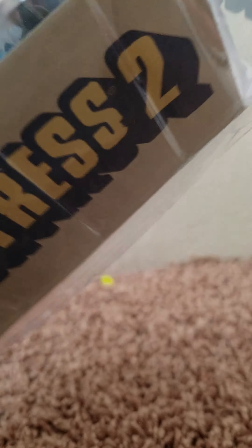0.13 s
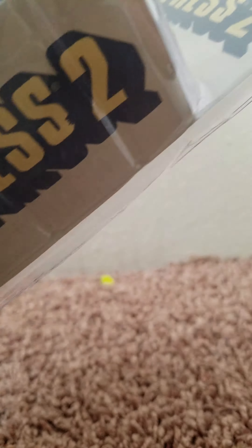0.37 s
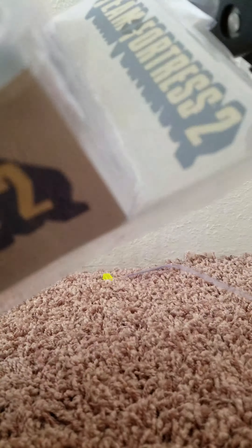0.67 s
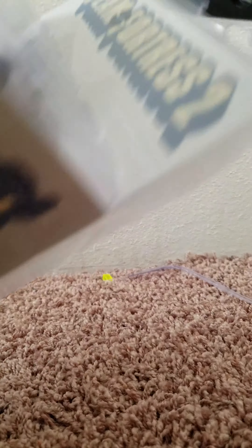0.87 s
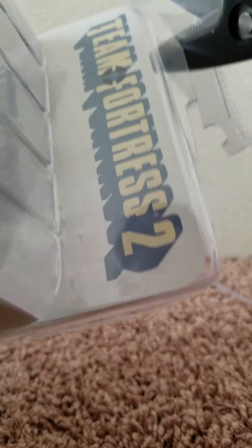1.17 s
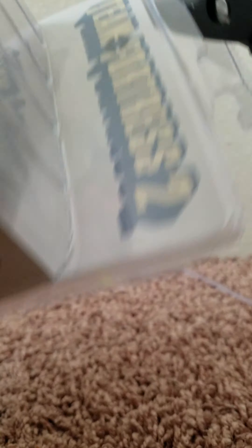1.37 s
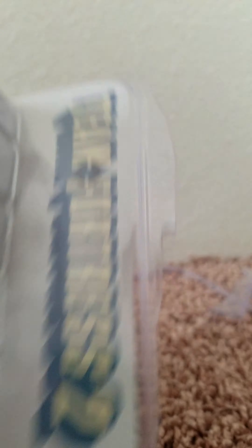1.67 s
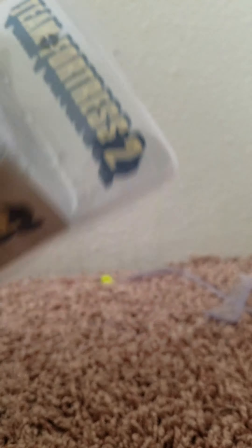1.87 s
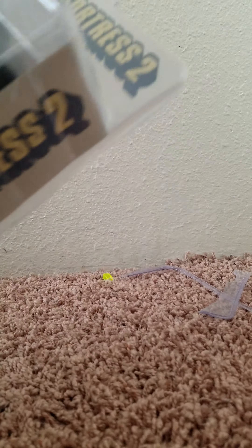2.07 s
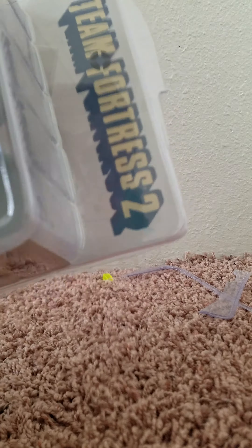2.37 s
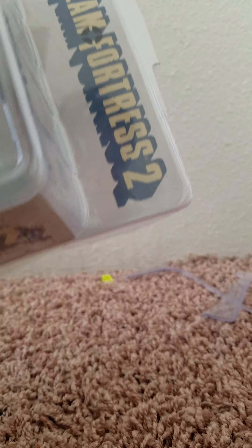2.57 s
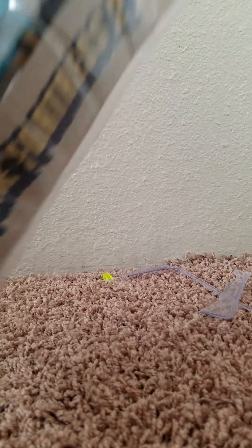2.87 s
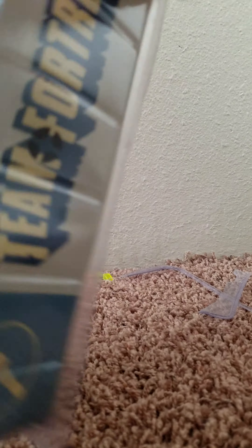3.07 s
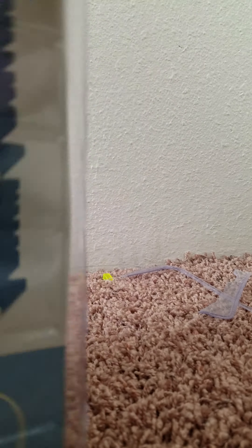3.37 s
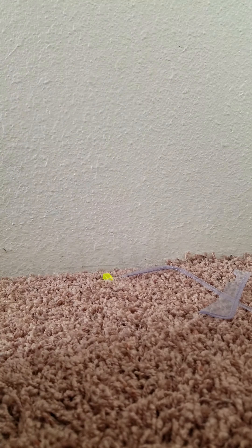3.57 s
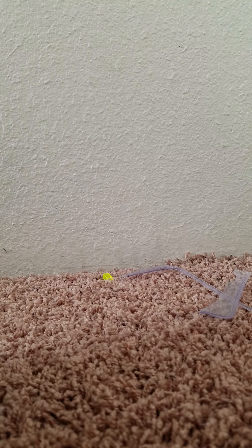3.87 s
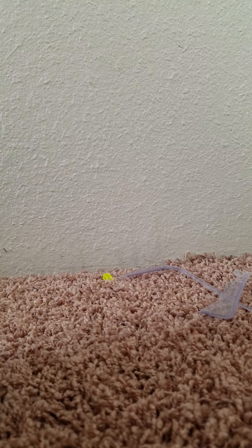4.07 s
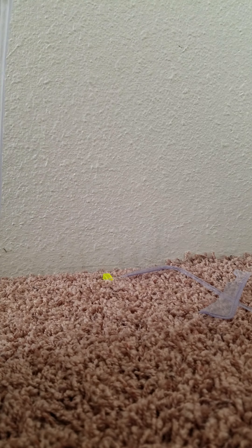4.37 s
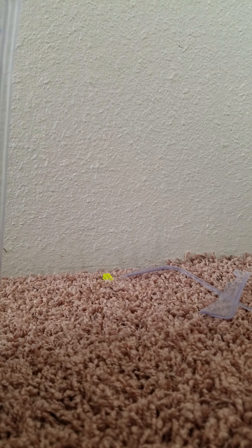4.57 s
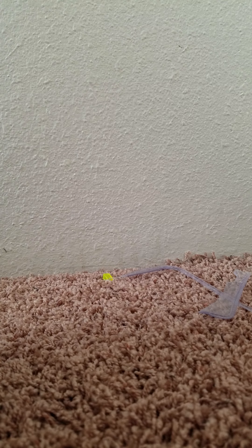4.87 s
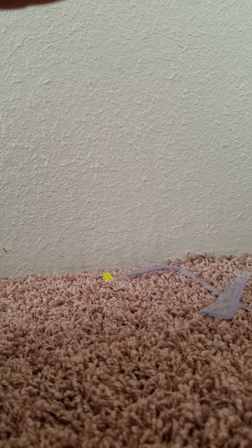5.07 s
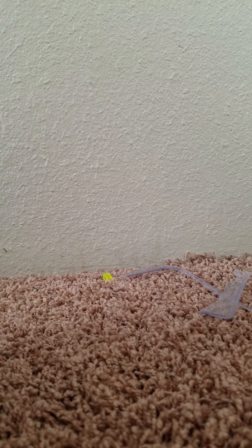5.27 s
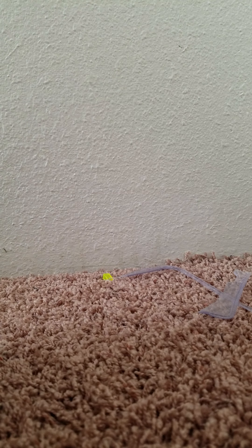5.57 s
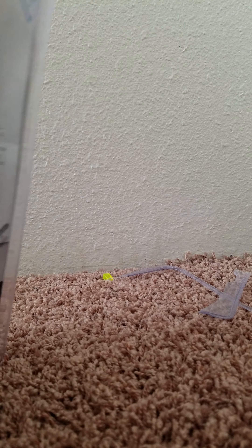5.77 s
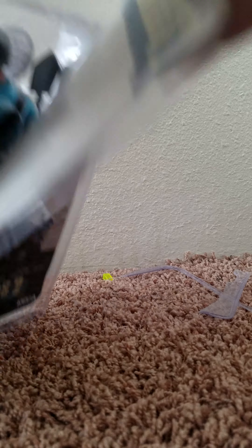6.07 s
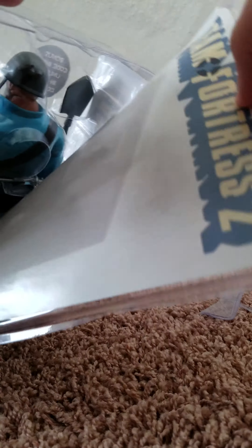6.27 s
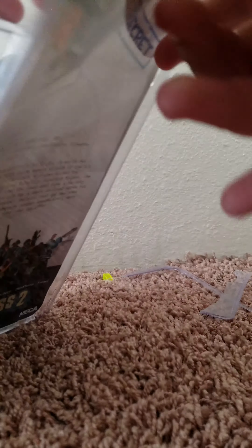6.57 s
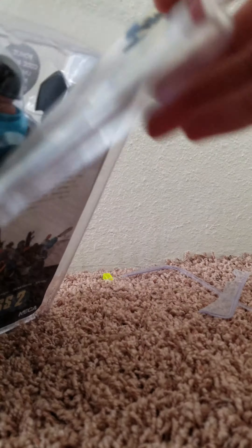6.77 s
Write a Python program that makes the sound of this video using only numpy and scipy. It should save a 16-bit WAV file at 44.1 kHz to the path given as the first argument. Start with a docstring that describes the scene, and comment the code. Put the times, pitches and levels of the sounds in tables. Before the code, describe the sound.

Hard plastic packaging is worked open by hand, heard close up over a low hum of room air. Creases buckle with sharp cracks, each with a slight hollow boom, and the bent sheet crinkles between them. After a busy start the handling turns softer, with fingers sliding faintly on the plastic. The loudest snaps come past the middle, and a short crackling rip of the seam finishes it.

```python
"""A stiff clear plastic pack is torn and pulled open by hand, close to two microphones in a carpeted room.
Creases buckle with a crack of a few ms, and each impulse sets the damped modes of the hollow shell booming.
Between snaps the bent sheet crinkles in clumps of tiny cracks and fingers rub faintly on the plastic;
near the end the welds of a seam part one by one. The room adds a short tail over a low hum of air."""
import sys
import numpy as np
from scipy import signal
from scipy.fft import rfft, irfft, next_fast_len
from scipy.io import wavfile
from scipy.ndimage import map_coordinates

SR = 44100
rng = np.random.default_rng(int(sys.argv[2]) if len(sys.argv) > 2 else 0)


def master_out(mix):
    """Clip the mix to full scale and print it as 16-bit PCM to the path in sys.argv[1]."""
    frames = np.transpose(np.atleast_2d(mix))
    ceiling = np.clip(frames, -1, 1)
    pcm = np.round(ceiling * 32767).astype(np.int16)
    wavfile.write(sys.argv[1], SR, pcm)


N = 305172

# The sheet held bent or pulled: (start [s], hold [s], crinkle level [dB], rumble re crinkle [dB])
CRUNCH_EVENTS = [(0, 0.00097, -52, 3), (.15, 0.13, -58.5, 1), (0.428, 0.083, -44, -1),
                 (0.486, 0.014, -33.5, 7.5), (0.624, 0.071, -47, -11), (0.744, 0.0059, -42.5, 5),
                 (0.78, 0.054, -54.5, 16.5), (1.09, 0.0045, -33, 9), (.95, 0.069, -64, 10),
                 (1.222, 0.14, -56.5, 5), (1.444, 0.023, -36, -7.5), (1.681, 0.12, -59, -6.5),
                 (2.11, 0.04, -46.5, -12), (2.958, 0.06, -50, 6.5), (3.044, 0.051, -47, 6.5),
                 (3.098, .08, -54.5, 6.5), (3.389, 0.12, -61, 12), (3.68, 0.19, -64, -0.5),
                 (4.092, 0.031, -63.5, -10), (4.392, 0.14, -66, 3), (4.738, 0.062, -62, 16.5),
                 (4.83, 0.023, -36, 6.5), (4.961, 0.047, -51, -3), (5.316, 0.05, -62, 3.5),
                 (5.588, 0.063, -51, 1), (5.707, 0.14, -50.5, -2.5), (6.051, 0.038, -49.5, -13),
                 (6.095, 0.04, -54.5, 0.5), (6.34, 0.12, -39, -28), (6.629, 0.031, -43, -6),
                 (6.744, 0.105, -38.5, -11.5)]
# Where the hands are and what they hold: (time [s], lead of the left microphone [ms], sliding level [dB],
# dull card band re bright blister band [dB], crinkle treble [dB])
HAND_PATH = [(0, 0.35, -68, -3.5, -5), (1.45, 0.21, -68.5, -4.5, -5.5), (2.1, 0.23, -81.5, -11, -1.5),
             (2.9, 0.24, -68, 1, -8), (3.9, 0.2, -68.5, -5, -8), (4.5, 0.41, -63, 2.5, -6),
             (4.65, 1.4, -66, 4.5, -1.5), (5.4, 1.44, -79, -7.5, -19.5), (5.6, 0.36, -66.5, 3, -9),
             (6.92, 0.28, -57, -13, -19)]
# Modes of the hollow shell and its card: (frequency [Hz], level [dB], T60 [s])
SHELL_MODES = [(67, -8, 0.014), (98, -6, 0.04), (139, -12, 0.12), (194, -3.5, 0.026), (291, -8, 0.035),
               (348, -9.5, 0.036), (499, -4.5, 0.025), (584.8, -1.5, 0.025), (629, -5, 0.019),
               (787, -16.5, 0.033), (995, -15, 0.018)]
# The grip closes and opens the blister's cavity: (time [s], cavity modes re card modes [dB])
CAVITY_BALANCE = [(0.11, 3.5), (0.42, -6), (0.49, 1), (0.7, 1.5), (1.12, -4.5), (1.44, -2.5), (2.1, -3),
                  (2.2, -18), (2.95, 4.5), (3.4, -0.5), (4.79, -1), (4.82, 2), (5.9, 1), (6.1, -13),
                  (6.35, 2.5), (6.6, -5.5)]
# Resonances of the microphone ports: (frequency [Hz], width [Hz], left gain [dB], right gain [dB])
PORT_RESONANCES = [(671.6, 453, 7.5, 18.5), (1390, 350, 4.5, 6), (3120, 2400, 5, -6.5), (5000, 5300, -4, 7),
                   (8190, 1300, 5.5, 9), (9800, 8400, -7.5, -5)]
# Room tone: (frequency [Hz], relative spectral density [dB])
AIR_SPECTRUM = [(30, -18.5), (58, 11.5), (80, -4.5), (125, 3), (240, -12.5), (400, -14.5), (580, -15.5),
                (1100, -21.5), (4000, -33), (6500, -39), (16000, -35)]
# Creases snapping: (time [s], crack level [dB], colour [Hz], relative boom [dB], treble re crack [dB])
CREASE_SNAPS = [(0.107, -20, 1130, 2.5, -2.5), (0.307, -33.5, 1220, 1, -5), (0.415, -16, 3040, -11, -39),
                (0.4845, -16.5, 1390, -10.5, -15), (0.6696, -9.5, 3476, -20.5, -3),
                (0.6954, -14, 1490, -8, -3.5), (0.7575, -24.5, 2320, -15, -7),
                (0.7855, -21.5, 2830, -15, -2.5), (0.8177, -26.5, 1520, -7, -7),
                (0.895, -26.5, 3840, -19, -7), (0.9288, -18, 2260, -11, 9),
                (1.043, -14.5, 3260, -26.5, -1.5), (1.0826, -7, 4900, -14, -2.5),
                (1.1, -13, 3200, -17.5, 3), (1.148, -3.5, 3700, -14.5, -5.5), (1.1635, -9, 4640, -6, -2.5),
                (1.2452, -27, 3340, -18.5, -19), (1.2946, -37.5, 1310, 3, 3), (1.4343, -5, 2700, -9.5, -16),
                (1.439, -10, 1490, -10.5, 9), (1.45, -21.5, 1780, 5.5, -20), (1.981, -38.5, 2790, -19, 8),
                (2.044, -40.5, 4640, -36.5, 4), (2.0905, -36, 4500, -12, -1), (2.106, -25, 4900, -8, 1),
                (2.2016, -35, 3500, -31, -4.5), (2.7181, -42, 1950, 0, -6), (2.8153, -38, 3860, -13, -22),
                (2.9876, -20, 1430, -12.5, -30), (3.069, -22, 1820, -16.5, -47),
                (3.0844, -20, 1510, -13, -42), (3.231, -40.5, 1370, -4.5, 8), (3.397, -42, 1370, -4, -3),
                (3.4059, -24.5, 1280, 3.5, -29), (3.5514, -41.5, 2780, -10.5, 0.5),
                (4, -40, 3900, -26.5, -7), (4.089, -43.5, 1500, -11.5, -7), (4.2976, -15, 1520, -17, -2.5),
                (4.313, -46, 1620, -7.5, -22), (4.4025, -42, 1340, -3.5, -1),
                (4.7118, -21.5, 2890, -14, -4), (4.7258, -30.5, 1330, -8, -23), (4.769, -8, 2710, -22, -7),
                (4.8201, -4.5, 2620, -11.5, -26), (4.8218, -1, 3880, -12, -8), (4.914, -26, 2820, -27, -11),
                (5.127, -37.5, 2880, -9.5, -14), (5.323, -45, 2910, -13, 1.5),
                (5.4748, -42.5, 1520, -16, -20.5), (5.622, -21, 2570, -17.5, -56),
                (5.723, -21, 2270, -16.5, -14), (5.833, -34.5, 3920, -19.5, 1),
                (5.903, -43, 1040, 15.5, -41), (6.085, -27.5, 1420, -6.5, -10),
                (6.151, -44, 1670, -15, 13.5), (6.346, -26, 2840, -4, -19), (6.391, -21, 2720, -23, -42),
                (6.417, -20, 3680, -15.5, -33), (6.454, -21.5, 2930, -27, -8),
                (6.593, -29.5, 1270, -4.5, -24)]
# Welds of the seam parting: (time [s])
WELD_TIMES = [6.7877, 6.8, 6.81, 6.825, 6.839, 6.854, 6.864, 6.881]


def amp(db):
    """Amplitude ratio of a level in decibels."""
    return 10 ** (np.asarray(db) / 20)


def unit_rms(x):
    """Normalisation to an rms of 1."""
    return x / np.sqrt(np.mean(x ** 2) + 1e-20)


def in_time(rows):
    """Linear interpolation of each column over time, one value a sample."""
    times, *columns = np.transpose(rows)
    return [np.interp(np.arange(N) / SR, times, column) for column in columns]


def drift(rate_hz):
    """Slow random fluctuation: low-passed noise of rms 1."""
    pole = np.exp(-2 * np.pi * rate_hz / SR)
    return unit_rms(signal.lfilter([1], [1, -2 * pole, pole ** 2], rng.standard_normal(N + SR))[SR:])


def band(x, low_hz, high_hz):
    """Butterworth band-pass, its upper edge held below the Nyquist frequency."""
    edges = [low_hz, min(high_hz, 0.45 * SR)]
    return signal.sosfilt(signal.butter(2, edges, "band", fs=SR, output="sos"), x)


def peak(x, hz, width_hz, db):
    """Resonance or antiresonance: a second-order peaking filter."""
    centre, gain = -2 * np.cos(2 * np.pi * hz / SR), amp(db / 2)
    width = np.tan(np.pi * width_hz / SR)
    numerator = [1 + width * gain, centre, 1 - width * gain]
    return signal.lfilter(numerator, [1 + width / gain, centre, 1 - width / gain], x)


def pair(noise, correlation):
    """Partial coherence: a wide sheet reaches two microphones by paths only partly alike."""
    return np.array([noise[0], correlation * noise[0] + np.sqrt(1 - correlation ** 2) * noise[1]])


def dying(noise, t60, rise_s):
    """Exponential decay after a brief rise."""
    t = np.arange(noise.shape[-1]) / SR
    return noise * (1 - np.exp(-t / rise_s)) * amp(-60 * t / t60)


def bending(swell_share, release_db_per_s, settle_db_per_s):
    """Loading and relaxation: envelopes of crinkle and rumble, and the share due to a held sheet."""
    crunches = [(*row, release_db_per_s, 1) for row in CRUNCH_EVENTS]
    # each snap leaves the sheet shivering, in proportion to its boom
    shivers = [(s, 0, db + boom_db - 24, 1.5, settle_db_per_s, 0) for s, db, _, boom_db, _ in CREASE_SNAPS]
    t, envelopes = np.arange(SR // 2) / SR, np.zeros((3, N + SR))
    for start_s, hold_s, db, rumble_db, fall_db_per_s, in_hand in crunches + shivers:
        rise = np.clip(t / (swell_share * hold_s + 1 / SR), 0, 1)
        gain = rise * amp(db - fall_db_per_s * np.maximum(t - hold_s, 0))
        at = round(start_s * SR)
        envelopes[:, at:at + len(t)] += gain * np.array([[1], [amp(rumble_db)], [in_hand]])
    sheet, rumble, held = envelopes[:, :N]
    return sheet, rumble, held / (sheet + 1e-9)


def crinkle(per_s, spread_db, clump_db, grain_t60, swish):
    """Shot noise: tiny cracks of unequal size come in clumps, each a puff of noise, over a smooth swish."""
    onsets = rng.random(N) < per_s * amp(clump_db * drift(14.0)) / SR
    sizes = onsets * amp(spread_db * np.minimum(rng.exponential(1, N), 4))
    puffs = signal.lfilter([1], [1, -amp(-60 / (grain_t60 * SR))], sizes + 1e-18)
    noise = pair(rng.standard_normal((2, N)), correlation=0.25)
    return unit_rms((unit_rms(puffs) + swish) * noise)


def sheet_radiation(grains, card_db, fizz):
    """Superposition of dull card, bright blister and fizz; alternate signs join the bands without a dip."""
    card = amp(card_db) * unit_rms(band(grains, 820, 1800))
    blister = unit_rms(peak(band(grains, 2400, 4600), 1600, 1400, db=1.5))
    return unit_rms(card - blister + fizz)


def finger_friction(fizz):
    """Sliding friction: skin on plastic gives a smooth, dull band of noise under some fizz."""
    noise = pair(rng.standard_normal((2, N)), correlation=0.67)
    rub = peak(band(noise, 1300, 3900), 1800, 270, db=12.5)
    return unit_rms(band(rub, 500, 7500)) + amp(-4.0) * fizz


def shell(force, scatter_db, lean_db, cavity_above_hz):
    """Forced vibration of damped modes; the grip varies how well each radiates and to which side."""
    boom, (cavity_db,) = 0, in_time(CAVITY_BALANCE)
    grip = [drift(8.2) for _ in SHELL_MODES]
    for k, (hz, level_db, t60) in enumerate(SHELL_MODES):
        radius, angle = amp(-60 / (t60 * SR)), 2 * np.pi * hz / SR
        balance_db = np.sign(hz - cavity_above_hz) * cavity_db / 2
        drive = force * amp(level_db + balance_db + scatter_db * grip[k])
        ring = signal.lfilter([0, np.sin(angle)], [1, -2 * radius * np.cos(angle), radius ** 2], drive)
        sides = amp(lean_db * grip[k - 1] * np.array([[1], [-1]]))
        boom = boom + (-1) ** k * sides * ring
    return boom


def direct_sound(bright, boom, lead_ms, pan_db):
    """Path difference: the right microphone hears the pack later and weaker than the left."""
    samples, lag = np.arange(N), lead_ms * SR / 1000
    late_bright = map_coordinates(bright[1], [samples - lag], order=3)
    late_boom = np.interp(samples - 0.041 * lag, samples, boom[1])   # the whole shell booms, so lags less
    left = bright[0] + amp(-0.5) * boom[0]
    return np.array([left * amp(pan_db / 2), (late_bright + late_boom) * amp(-pan_db / 2)])


def room(x, t60, wall_cut_hz):
    """Reverberation: eight feedback delays a side, dulled by wall absorption on every round trip."""
    size = next_fast_len(N + SR)
    omega = 2 * np.pi * np.arange(size // 2 + 1) / size
    wall = np.sqrt(1 / (1 + 1j * omega * SR / (2 * np.pi * wall_cut_hz)))
    tails = np.zeros((2, len(omega)), complex)
    for k, lag in enumerate(rng.uniform(0.006, 0.033, 16) * SR):
        round_trip = amp(-60 * lag / SR / t60) * wall * np.exp(-1j * omega * int(lag))
        tails[k % 2] += (-1) ** (k // 2) * round_trip / (1 - round_trip)
    return irfft(tails * rfft(x, size), size)[:, :N]


def ports(left, right):
    """Port resonance colours each microphone in its own way."""
    for hz, width_hz, left_db, right_db in PORT_RESONANCES:
        left, right = peak(left, hz, width_hz, left_db), peak(right, hz, width_hz, right_db)
    return np.array([left, right])


def air(level_db, coherent_below_hz, waver_db):
    """Diffuse field: wavering room tone, coherent at the two microphones only in the bass."""
    hz = np.arange(N // 2 + 1) * SR / N + 1
    knots_hz, knots_db = np.transpose(AIR_SPECTRUM)
    colour = amp(np.interp(np.log(hz), np.log(knots_hz), knots_db))
    coherence = 1 / (1 + (hz / coherent_below_hz) ** 2)
    mid, side = rfft(rng.standard_normal((2, N)))
    spectra = np.sqrt(1 + coherence) * mid + np.sqrt(1 - coherence) * side * [[1], [-1]]
    return amp(level_db + waver_db * drift(2.0)) * unit_rms(irfft(colour * spectra, N))


def snaps(events, force_db, crack_t60, flutter_t60):
    """Sudden release of elastic energy: each snap radiates a crack and exerts a force on the shell."""
    size = SR // 10
    cracks, force = np.zeros((2, N + size)), np.zeros(N + size)
    shove = 7.63 * np.exp(-np.arange(size) / (0.00032 * SR))
    for s, db, hz, boom_db, treble_db in events:
        at, noise = round(s * SR), rng.standard_normal((3, size))
        burst = pair(noise, correlation=0.24)
        mid = band(dying(burst, crack_t60, rise_s=0.00077), min(1400, 1.3 * hz), min(4200, 3.7 * hz))
        mid = peak(mid, hz, 0.35 * hz, db=11.5)
        high = band(dying(burst, 0.47 * crack_t60, rise_s=0.00044), 3800, 0.45 * SR)
        crack = mid / np.abs(mid).max() - amp(treble_db) * high / np.abs(high).max()
        cracks[:, at:at + size] += amp(db) * crack
        flutter = dying(noise[2] + shove, flutter_t60, rise_s=0.0012)
        force[at:at + size] += amp(db + boom_db + force_db) * flutter
    return cracks[:, :N], force[:N]


def seam_welds(level_db, colour_hz, boom_db, treble_db):
    """Stepwise fracture of a seam: one small snap event for each weld that parts."""
    return [(s, level_db, colour_hz, boom_db, treble_db) for s in WELD_TIMES]


def scene():
    """Superposition at two microphones of the pack's direct sound, its reverberation and the room tone."""
    lead_ms, slide_db, card_db, treble_db = in_time(HAND_PATH)
    crinkling, rumbling, held = bending(swell_share=0.3, release_db_per_s=595, settle_db_per_s=239.5)
    sliding = amp(slide_db + 3.0 * drift(5.0))
    welds = seam_welds(level_db=-28.5, colour_hz=2900, boom_db=-9, treble_db=-8)
    cracks, snap_force = snaps(CREASE_SNAPS + welds, force_db=-20.5, crack_t60=0.022, flutter_t60=0.063)
    swish = 0.12 + 0.45 * held   # a held sheet also drags and swishes
    grains = crinkle(per_s=410, spread_db=5.0, clump_db=3.5, grain_t60=0.018, swish=swish)
    fizz = amp(treble_db) * unit_rms(band(grains, 6000, 0.45 * SR))
    bright = cracks + crinkling * sheet_radiation(grains, card_db, fizz) + sliding * finger_friction(fizz)
    handling_force = amp(-15.5) * (rumbling + sliding) * band(grains[0], 43, 450)
    boom = shell(snap_force + handling_force, scatter_db=2.5, lean_db=1.04, cavity_above_hz=420)
    direct = direct_sound(bright, boom, lead_ms, pan_db=3)
    tail = room(bright[0] + 0.3 * boom[0], t60=0.27, wall_cut_hz=4400)   # little of the close boom returns
    left, right = direct + amp(-19.5) * tail
    return ports(left, right) + air(level_db=-56, coherent_below_hz=700, waver_db=2.0)


def record(dry):
    """Band limiting and soft saturation: deep bass is cut, the loudest cracks rounded, the top cut."""
    dry = signal.sosfilt(signal.butter(4, 48, "high", fs=SR, output="sos"), dry)
    rounded = dry / (1 + np.abs(dry) ** 4) ** 0.25
    return signal.sosfilt(signal.ellip(10, 0.5, 90, 16500, fs=SR, output="sos"), rounded)


dry = scene()
out = record(dry)
master_out(out)
```